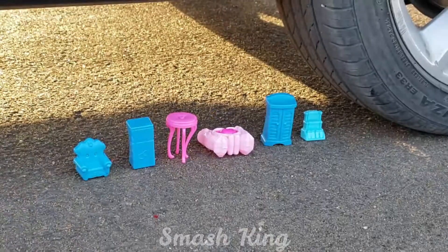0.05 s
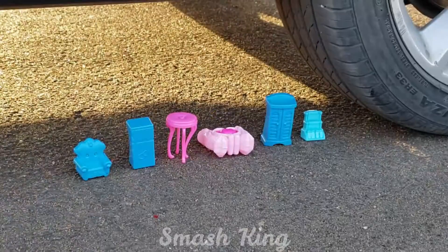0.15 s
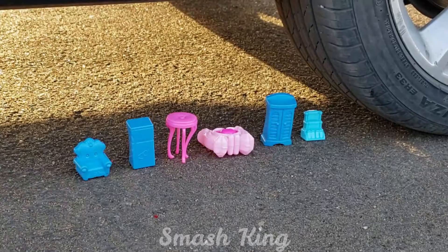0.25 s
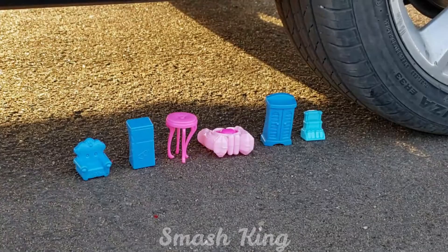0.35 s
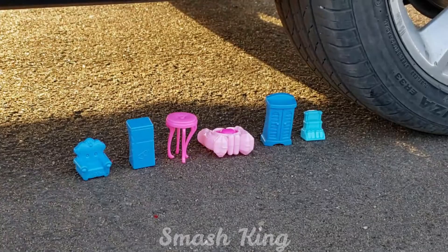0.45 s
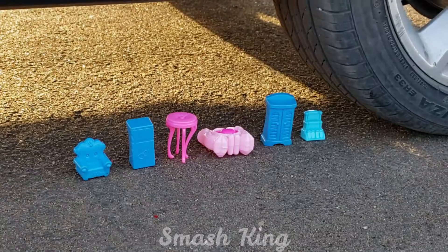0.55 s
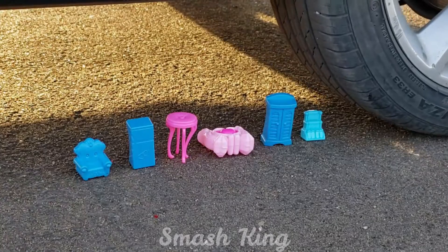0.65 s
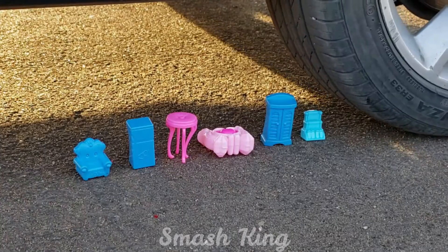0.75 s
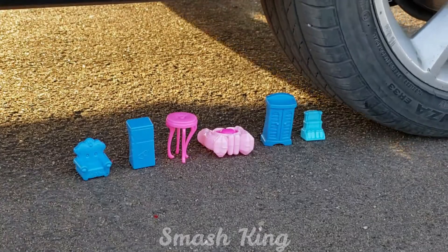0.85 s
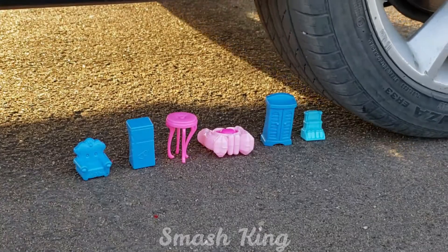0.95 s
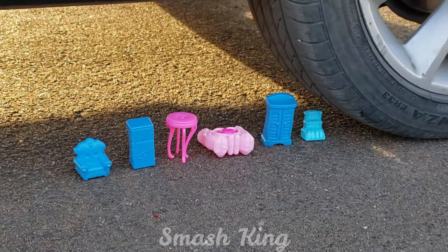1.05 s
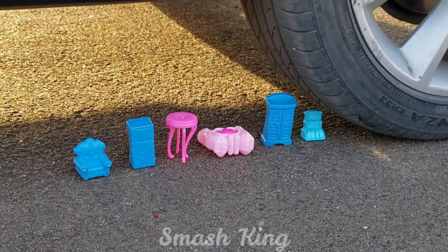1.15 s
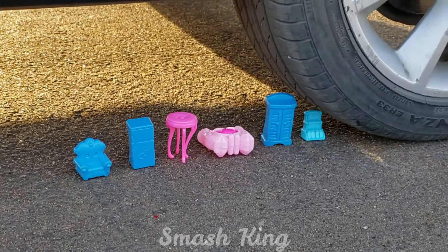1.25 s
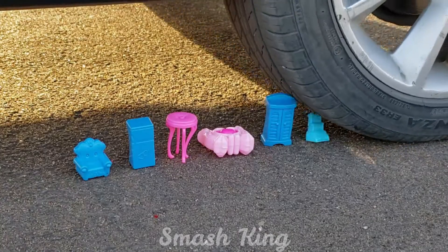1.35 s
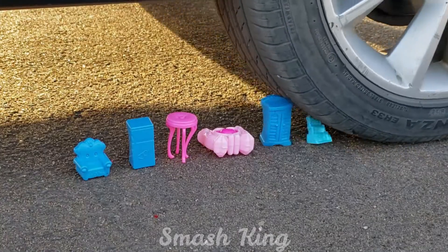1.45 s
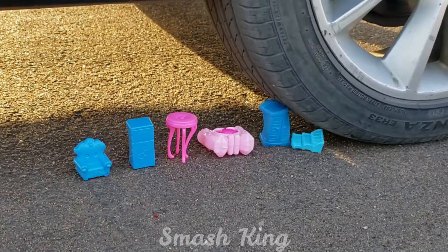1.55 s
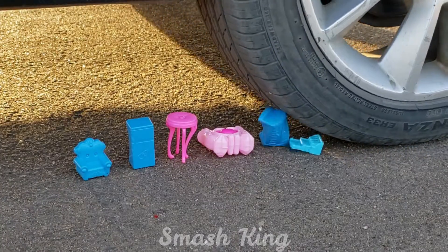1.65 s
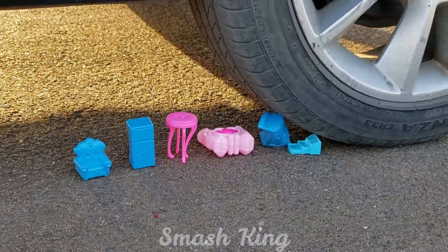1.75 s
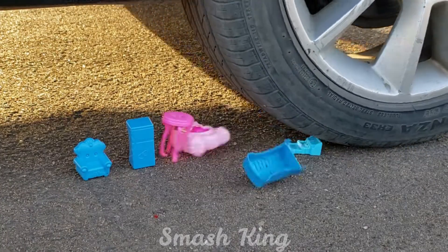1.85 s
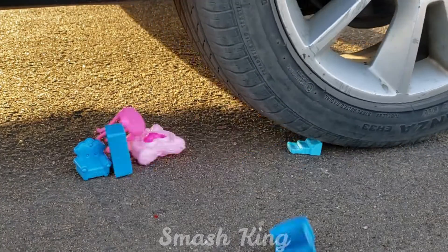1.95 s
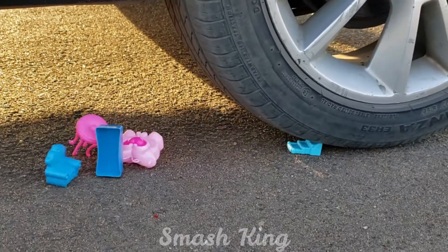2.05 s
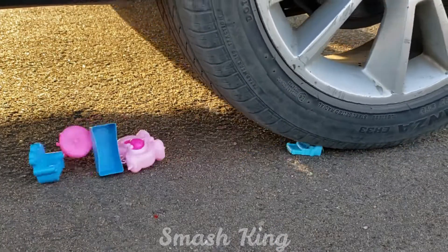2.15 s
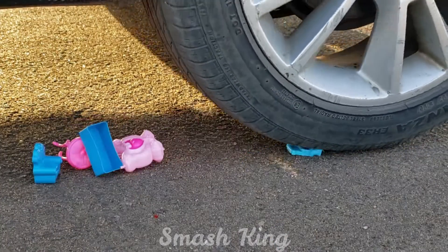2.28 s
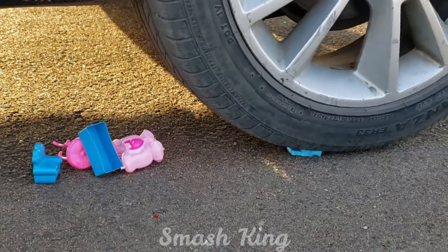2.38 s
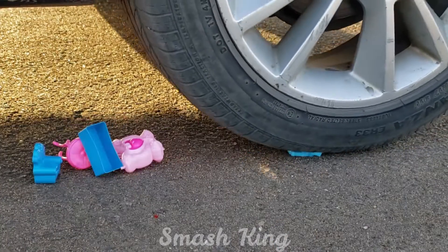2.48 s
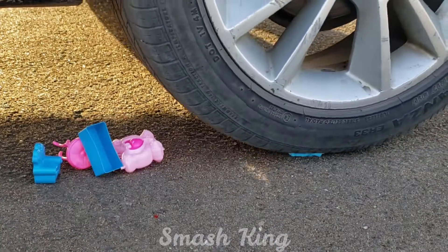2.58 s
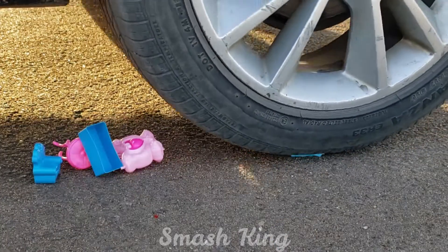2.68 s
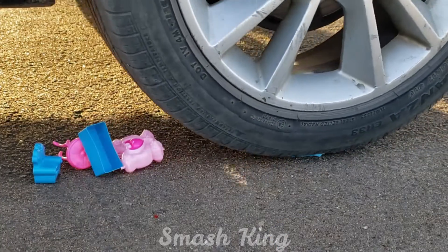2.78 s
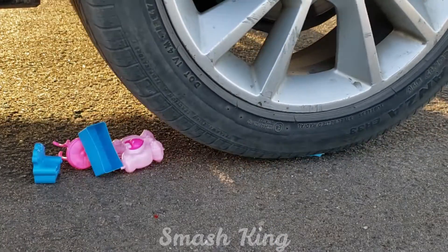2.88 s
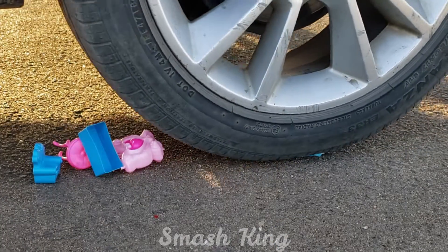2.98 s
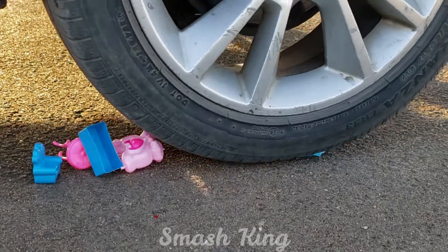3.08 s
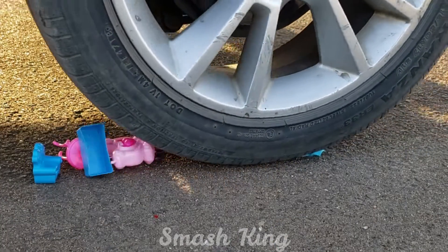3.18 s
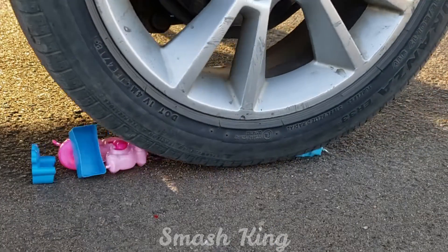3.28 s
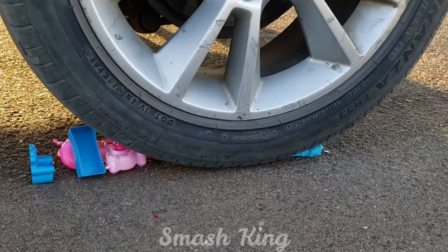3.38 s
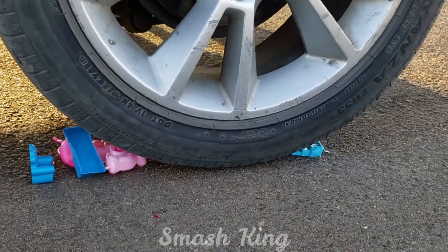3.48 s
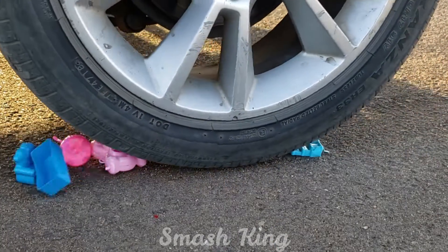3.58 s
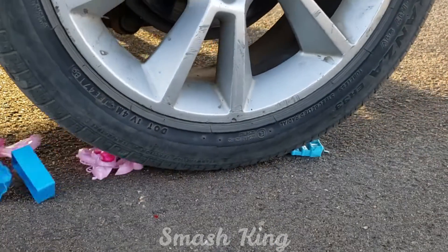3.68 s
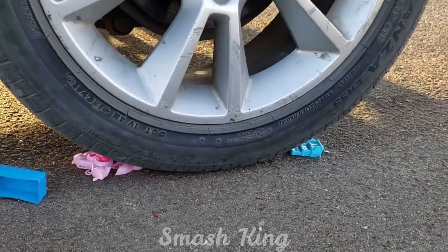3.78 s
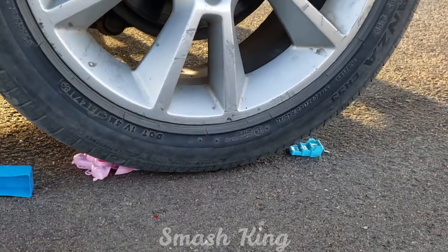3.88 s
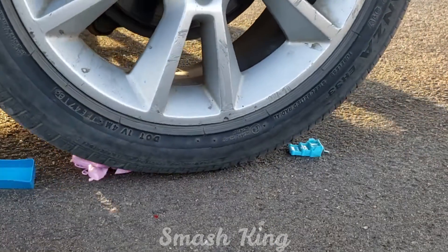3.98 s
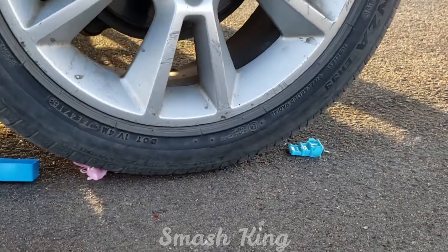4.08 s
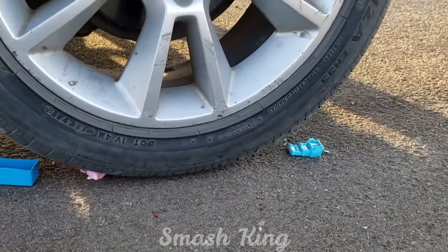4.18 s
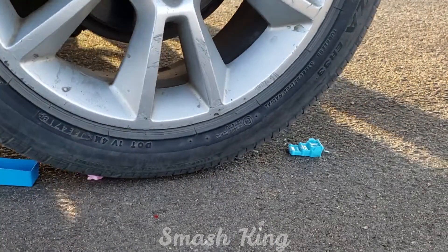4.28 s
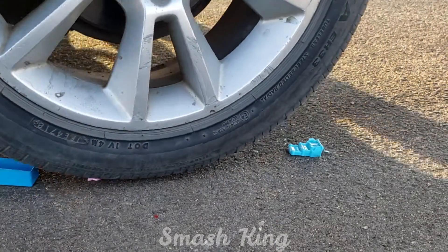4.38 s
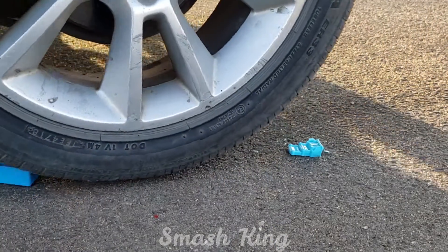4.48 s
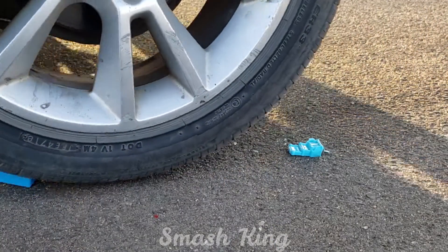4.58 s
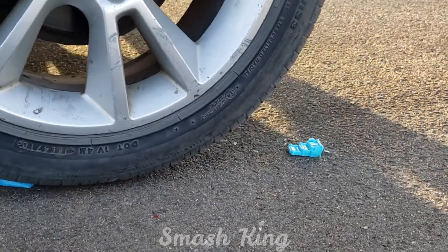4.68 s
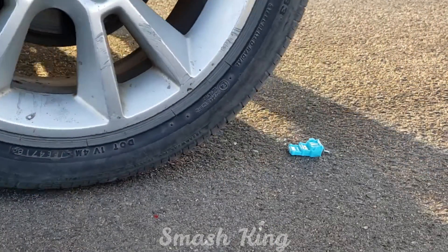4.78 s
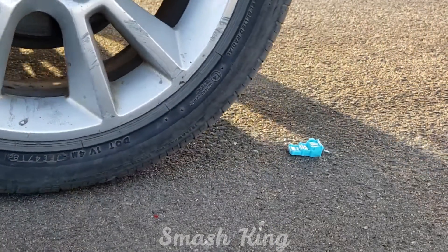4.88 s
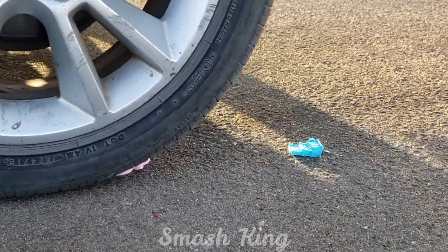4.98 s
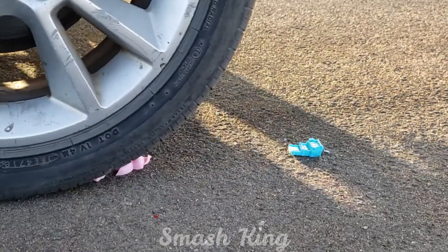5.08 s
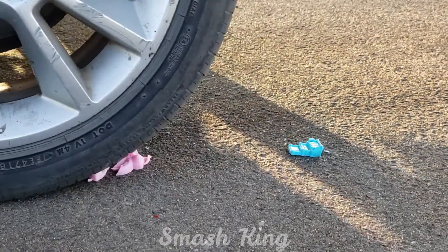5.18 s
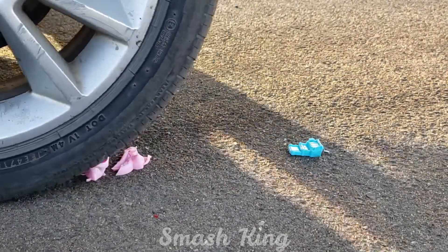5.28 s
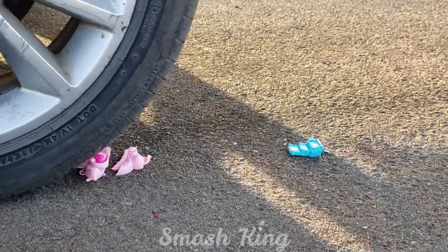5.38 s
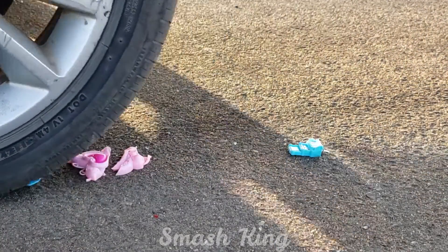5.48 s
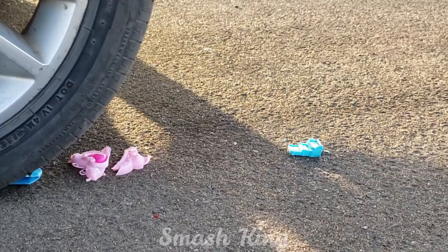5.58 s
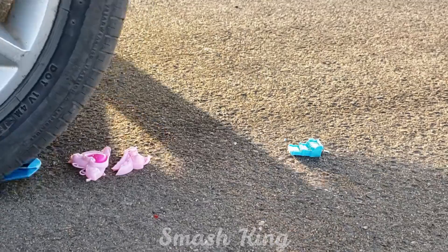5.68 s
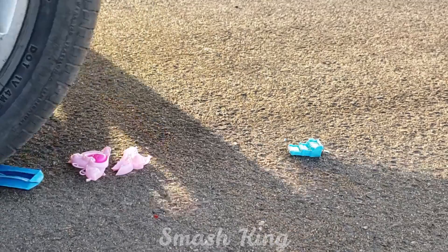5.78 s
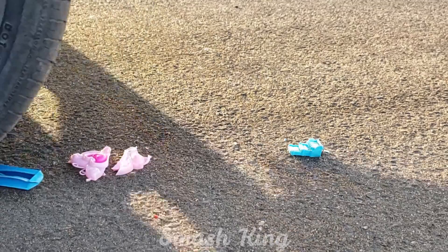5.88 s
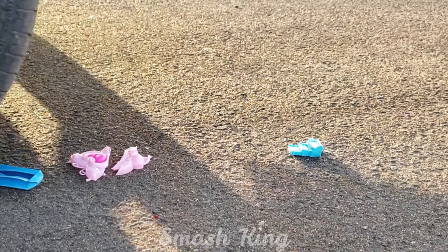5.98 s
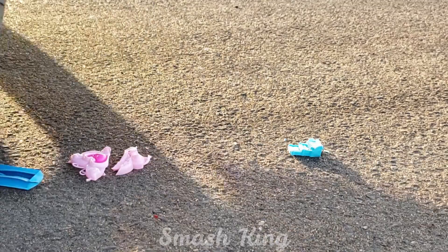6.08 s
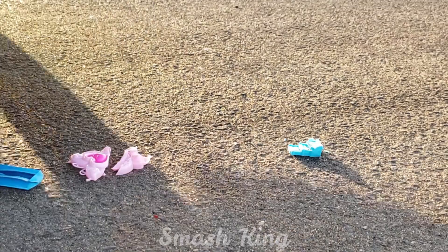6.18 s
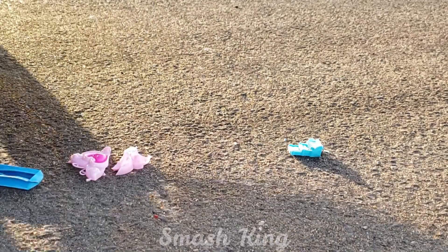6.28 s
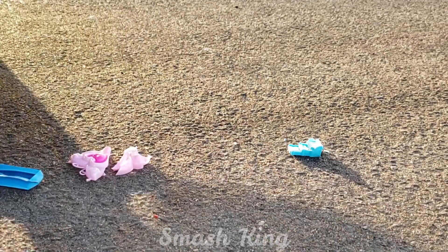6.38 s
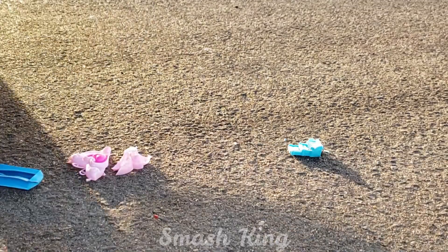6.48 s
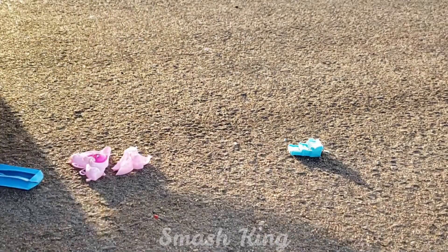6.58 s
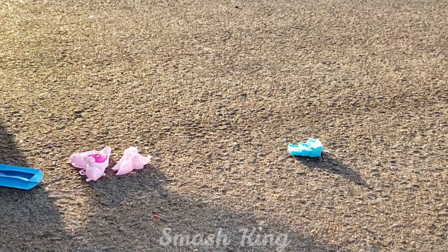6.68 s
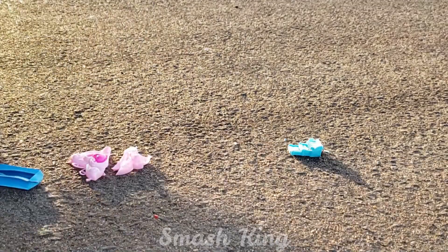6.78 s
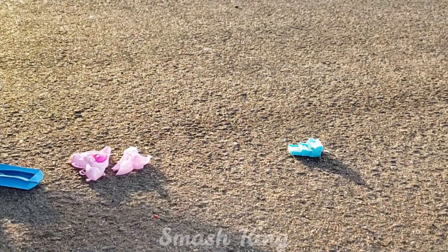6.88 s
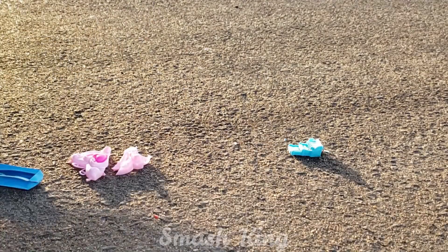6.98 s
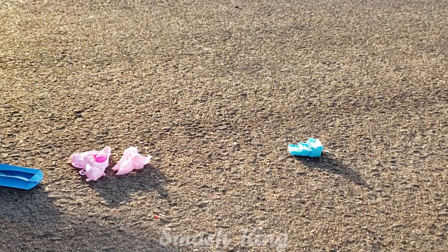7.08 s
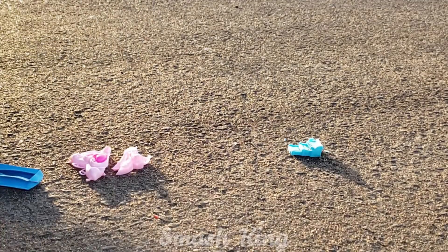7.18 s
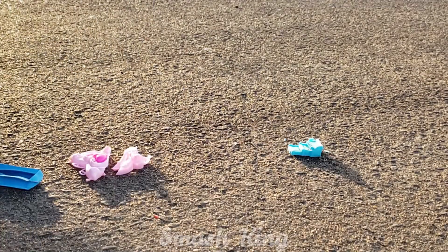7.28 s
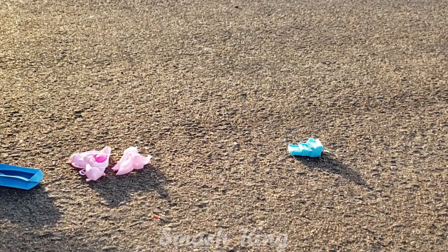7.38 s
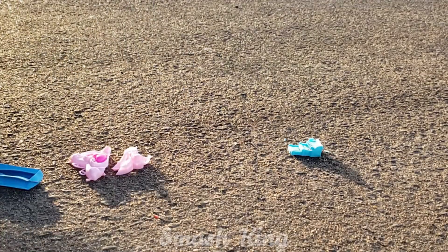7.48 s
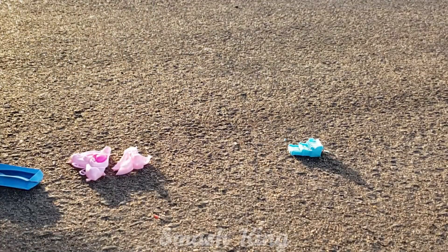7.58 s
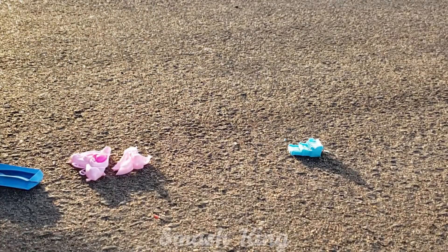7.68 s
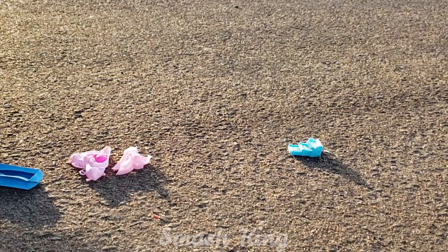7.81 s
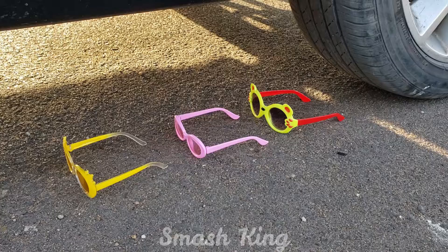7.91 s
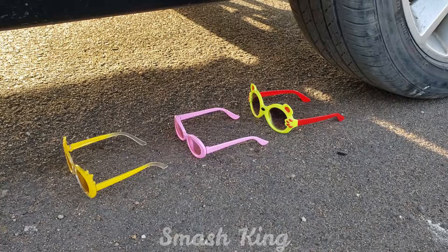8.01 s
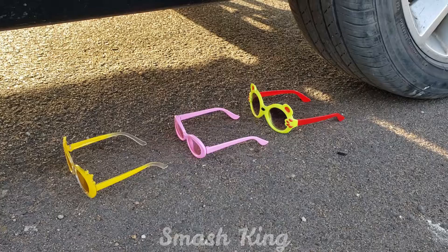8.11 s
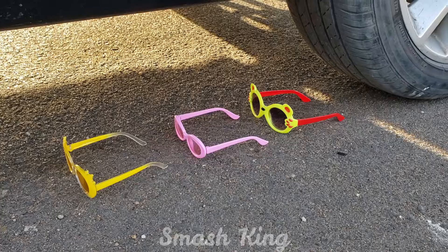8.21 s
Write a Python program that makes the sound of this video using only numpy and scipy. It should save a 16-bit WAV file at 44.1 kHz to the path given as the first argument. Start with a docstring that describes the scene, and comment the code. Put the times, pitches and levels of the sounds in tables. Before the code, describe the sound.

Heard from ground level, a car rolls slowly over plastic toys on asphalt. The engine rumbles alone at first, then settles as sharp, loud cracks and fine crunching begin. The wheel thuds down twice, and a squeezed toy creaks briefly. The snaps thin out as the engine drifts to the left, and in the last moment it abruptly idles closer and a little faster.

```python
"""A car engine idles close by, down at asphalt level, then settles as the car creeps over small plastic toys.
Their hollow shells snap, splinter and creak under the tyre, and twice the wheel drops off one with a ringing
thud. The engine, a pulsing exhaust note with rumble, roar and valve clatter, passes from right to left; at the
very end it abruptly grows louder and idles a little faster. Everything reaches the two ports of a microphone on
the ground with small gaps in time and level."""
import sys
import numpy as np
from scipy import signal
from scipy.fft import rfft, irfft
from scipy.io import wavfile
from scipy.ndimage import uniform_filter1d

SR = 44100
rng = np.random.default_rng(int(sys.argv[2]) if len(sys.argv) > 2 else 0)


def transcribe(u):
    """Save the signal u as a 16-bit wav file named by the first command-line argument.

    u: samples, shape (n,) or (channels, n), limited to [-1, 1]; the rate is SR.
    q: integer samples, one column per channel.
    """
    v = np.clip(np.atleast_2d(u).T, -1, 1)
    q = np.round(v * 32767).astype(np.int16)
    wavfile.write(sys.argv[1], SR, q)


N = 363825
T = np.arange(N) / SR

# Each snap of a toy: start_s, peak_rms_db, ring_hz, low_tilt_db, treble_tilt_db
CRACK_HITS = [(1.395, -31, 1230, 3, -6), (1.425, -14, 1600, -1, 2.5), (1.46, -29.5, 1230, -10, -3),
              (1.502, -25, 1620, 6, 11), (1.506, -20.5, 931, 3, 2), (1.531, -23.5, 1040, 9, 5),
              (1.567, -10.5, 1140, -12, 4.5), (1.572, -19, 3130, -16, 1), (1.579, -18, 1410, -30, 3),
              (1.66, -23.5, 3270, -29, -8), (1.73, -33, 1540, -22, -9), (1.919, -4.5, 2360, 5.5, -9.5),
              (1.934, -9, 2370, 2, -8), (1.945, -22, 2310, 11, 4), (1.957, -18.5, 810, -1, 0),
              (1.97, -19, 2100, 11, 1), (1.999, -24, 1500, 12, -5), (2.031, -24.5, 900, 15, 2),
              (2.047, -23.5, 680, 13, -8), (2.059, -27.5, 5830, 0, 7), (2.077, -17, 878, -7.5, -10.5),
              (2.103, -20, 2170, -20, -10), (2.117, -24.5, 1910, 10, -4), (2.173, -21.5, 2330, -2, -5.5),
              (2.215, -24.5, 2220, 6, -15), (2.225, -19.5, 2000, 6, 9), (2.256, -14, 602, 12.5, 5),
              (2.264, -22, 1400, 12, -11), (2.335, -27.5, 2220, 7, -6), (2.373, -29, 2180, 9, 8),
              (2.383, -20, 1126, 18, 17.5), (2.424, -24.5, 2500, -19, 10.5), (2.491, -34.5, 707, 1, 16),
              (2.557, -18, 1900, 13.5, 4.5), (2.665, -46, 703, -15, 14), (3.263, -31.5, 970, 3, -11),
              (3.355, -36, 980, 8, -6), (3.383, -30.5, 980, 0, -3), (3.41, -21.5, 3000, 2, 9),
              (3.439, -36, 1220, -26, 3), (3.527, -32.5, 730, 7, -42), (3.569, -25.5, 690, 2.5, -30),
              (3.593, -32.5, 1008, 12, -9), (3.626, -33.5, 1230, 18, 0), (3.658, -24.5, 2500, 4, -5),
              (3.677, -28, 1970, -1, -7), (3.706, -25, 1940, 4, -19), (3.716, -10.5, 1490, -2, -15.5),
              (3.732, -16.5, 1710, 3, 2), (3.736, -17, 850, -9, 1), (3.746, -23, 2050, 14, -18),
              (3.801, -28.5, 716, -18, -0.5), (3.829, -37, 4520, -3, -5), (3.849, -33, 2170, -6, -12),
              (3.874, -27, 3730, -16, -3), (3.888, -47, 3503, -12, -15), (3.898, -29.5, 1840, -3, -15),
              (3.908, -37, 3690, -13, -2), (3.92, -38, 1580, -5, -25), (3.927, -29.5, 3930, -13, -1.5),
              (3.954, -36, 2360, -16, -3), (4.039, -24.5, 3760, -20, -6), (4.073, -33, 2094, -9, -10),
              (4.12, -27, 674, -9, -3), (4.164, -33, 4210, -14, -7), (4.184, -34, 2120, -9, -1),
              (4.199, -24, 2120, 11, 5), (4.335, -34.5, 2143, -10, -20), (4.407, -39.5, 1880, -31, -5),
              (4.531, -28.5, 5000, -26, 1.5), (4.608, -13.5, 762, 1, 0.5), (4.679, -30, 840, 13, -11.5),
              (4.83, -38, 1370, 2, 6), (4.875, -14.5, 2680, 0.5, -2), (4.904, -25.5, 2547, 1, -6),
              (4.955, -10, 2330, -1, 1.5), (5.291, -43, 2685, 6, 0), (5.303, -45, 740, 1, 4),
              (5.834, -36.5, 1884, 6, -2), (6.248, -38, 696, -8, -5), (6.284, -27.5, 3390, 21.5, -5),
              (6.315, -24, 5960, -30, -7.5), (6.383, -32.5, 5455, 7, -6), (6.471, -10.5, 867, 8.5, -1.5),
              (6.677, -37, 950, -10, 0), (7.112, -42, 1320, -21, 3), (7.623, -40.5, 685, 13, -20),
              (7.884, -31.5, 677.5, 21.5, -6), (7.933, -37.5, 975, 11, -3), (8.193, -31.5, 648, 24, -9)]
# Tone colour of breaking plastic: freq_hz, gain_db
SHELL_EQ = [(180, -81.5), (300, -9.5), (797, -3), (1280, -2.5), (1540, -2), (1850, -4), (2500, -2),
            (3510, 0), (6650, -2), (9800, -11.5), (12200, -5), (15700, -5.5), (16800, -38)]
# Where the tyre sits in the stereo image: time_s, left_delay_ms, left_over_right_db
TYRE_PAN = [(1.4, 0.073, 0.5), (2.6, 0.08, -1), (3.4, -0.086, 2.5), (4.6, -0.12, 1.5), (5, -0.171, 2.5),
            (6.3, -0.33, 3.5), (8.25, -0.16, 12)]
def crack(start_s, level_db, ring_hz, low_db, treble_db, tear_ms=1.55):
    """A quick run of tiny breaks shakes the shell, which favours its own damped pitch."""
    t, hz = T[:4096], np.fft.rfftfreq(4096, 1 / SR)
    impulses = rng.laplace(size=4096) * (rng.random(4096) < .3)
    age = np.maximum(t - .001, 0) / (tear_ms / 1000)
    breaks = impulses * age ** 0.61 * np.exp(-1.6 * age ** 0.89)
    tilt_db = read([(500, low_db), (1800, 0.0013), (5000, 0.0036), (9000, treble_db)], hz)
    ring_db = np.clip(12.5 - 0.32 * treble_db, 5, 20)  # duller cracks ring more
    resonance_db = ring_db / (1 + (5 * np.log(hz / ring_hz + 1e-9)) ** 2)
    # Flatten the breaks' own colour so they push all pitches alike.
    ripple_db = 10 * np.log10(uniform_filter1d(abs(rfft(breaks)) ** 2, size=30) / np.sum(breaks ** 2))
    snap = coloured(breaks, read(SHELL_EQ, hz) + tilt_db + resonance_db - ripple_db)
    peak_rms = np.sqrt(uniform_filter1d(snap ** 2, size=66).max())
    near = ground_bounce(amp(level_db) * ports(snap / peak_rms, *curves(TYRE_PAN, start_s)))
    heard = underside_echo(near)
    add(heard, 0, near)
    return start_s - .0008, heard


def ground_bounce(x):
    """A few early reflections off asphalt and tyre wall, different at each port."""
    taps = rng.standard_normal((2, 64)) * (rng.random((2, 64)) < .12) * amp(-11.5)
    taps[:, 0] = 1  # the direct sound
    taps /= np.linalg.norm(taps, axis=1, keepdims=True)
    return signal.fftconvolve(x, taps, axes=1)[:, :x.shape[1]]


def underside_echo(x, bright_t60_s=.06, low_t60_s=.085, echo_db=-10):
    """Echoes between asphalt and car floor, different for each port and snap; treble dies first."""
    t = T[:4096]
    bright, low = rng.standard_normal((2, 2, 4096))
    low = signal.lfilter(*signal.butter(2, 1500, fs=SR), low)
    tail = (bright * amp(-60 * t / bright_t60_s) + low * amp(-3 - 60 * t / low_t60_s)) * (t > .0007)
    return signal.fftconvolve(x, amp(echo_db) * tail / np.linalg.norm(tail[0]), axes=1)


# Each thud of the wheel: start_s, gain_db, tyre_air_db, knock_db
WHEEL_DROPS = [(2.256, -23.5, -15.5, -10), (3.738, -24, -6, -2)]
# Ringing modes of rim and tyre: pitch_hz, level_db, t60_s
WHEEL_MODES = [(141.6, -5, 0.19), (208.7, 0, 0.22), (255.8, 4.5, 0.2), (344, -11, 0.12), (424, 0.5, 0.048),
               (610, -11, 0.048), (669, -15, 0.5), (950, -2.5, 0.017)]
def wheel_drop(start_s, gain_db, air_db, knock_db, air_hz=226, air_t60_s=1.47):
    """The wheel falls off a toy: a knock and a shudder ring the rim, tyre and its air; grit sprays."""
    t = T[:SR]
    modes = sum(amp(db - 60 * t / t60) * np.sin(2 * np.pi * hz * t) for hz, db, t60 in WHEEL_MODES)
    air_envelope = amp(air_db - 60 * t / air_t60_s) * (1 - np.exp(-t / 0.014))
    air = air_envelope * np.sin(2 * np.pi * air_hz * t)
    shudder = np.exp(-(t[:4096] / .0276) ** 2) * (1 - np.exp(-t[:4096] / .0045))
    force = 0.073 * rng.standard_normal(4096) * shudder
    force[0] = amp(knock_db)
    thud = ports(signal.fftconvolve(modes, force)[:SR] + air, lag_ms=0, pan_db=0.99)
    grit_eq = read(SHELL_EQ, np.fft.rfftfreq(4096, 1 / SR))
    grit = np.array([coloured(noise, grit_eq) for noise in rng.standard_normal((2, 4096))])
    add(thud, 0, amp(-0.5) * evened(grit) * shudder)
    return start_s, amp(gain_db) * thud


# Stretches of fine splintering: start_s, length_s, level_db, drift_db_per_s
CRUNCH_SPANS = [(1.392, .3, -46, -1), (1.937, 0.62, -36, -22), (3.226, 1.106, -52.5, 1)]
def crunch(splinters_per_s=250, t60_s=0.016):
    """Dense small splinters while plastic is under load, each a dry burst around its own pitch."""
    envelope = sum(amp(db + drift * (T - start)) * held(T, start, length, edge_s=0.085)
                   for start, length, db, drift in CRUNCH_SPANS)
    strength = amp(3.5 * np.minimum(rng.exponential(1, N), 4))
    splinters = strength * (rng.random(N) < splinters_per_s / SR)
    pitch_index = rng.integers(0, 16, N)
    out, t = np.zeros((2, N)), T[:1024]
    for k, hz in enumerate(np.geomspace(1500, 3000, 16)):
        burst = rng.standard_normal(1024) * t * amp(-60 * t / t60_s)
        grain = signal.lfilter(*signal.iirpeak(hz, 7, SR), burst)
        pair = ports(np.roll(evened(grain), 20), lag_ms=0.18 * rng.standard_normal(), pan_db=1.0)
        out += signal.oaconvolve((splinters * (pitch_index == k))[None], pair, axes=1)[:, :N]
    return envelope * evened(out)


# The stutters of one short creak: start_s, length_s, level_db
CREAK_SPANS = [(3.25, 0.0063, -40), (3.265, 0.011, -31.5), (3.281, 0.082, -41.5), (3.369, 0.02, -32)]
def creak(ring_hz=865, width_hz=303, slips_per_s=900):
    """A squeezed toy slips unevenly on the grit, ringing its hollow shell."""
    t = CREAK_SPANS[0][0] - .02 + T[:8192]
    slips = rng.standard_normal(len(t)) * (rng.random(len(t)) < slips_per_s / SR)
    shell = signal.iirpeak(ring_hz, ring_hz / width_hz, SR)
    ring = signal.lfilter(*shell, signal.lfilter(*shell, slips))
    envelope = sum(amp(db) * held(t, start, length, edge_s=0.0032) for start, length, db in CREAK_SPANS)
    return t[0], ports(evened(ring) * envelope, lag_ms=0, pan_db=-1.7)


# Fader moves of the passing engine: time_s, exhaust_db, engine_bay_db
ENGINE_LEVELS = [(0, -33, -43.5), (.6, -33, -45.5), (.9, -39.5, -45.5), (1.4, -29, -47), (1.9, -33, -52),
                 (2.6, -39.5, -57.5), (3.3, -38.5, -57), (3.9, -42, -59.5), (4.4, -46, -62.5),
                 (5.4, -41, -63), (6, -40.5, -62), (6.4, -35, -57.5), (7.1, -35.5, -58), (7.97, -30.5, -54),
                 (7.99, -36, -43), (8.1, -28, -47), (8.25, -35, -47)]
# Tone colours of the low rumble, midrange roar and bright clatter: freq_hz, gain_db
RUMBLE_EQ = [(12, -25), (20, -2), (43, 4.5), (64, 3), (102, -6.5), (160, -2.5), (182, -20.5), (206, -12),
             (400, -16), (520, -19.5), (880, -120)]
ROAR_EQ = [(180, 2), (300, -4.5), (499, -4), (548, -5), (598, 1), (747, -3), (1080, -8.5), (1220, -7),
           (2000, -22.5), (2600, -41), (4400, -120)]
CLATTER_EQ = [(940, -13), (1600, -2.5), (2140, 0.5), (2410, -5), (3110, -9.5), (5110, -11.5), (5530, -12),
              (5800, -13.5), (6220, -8), (8490, -23.5), (10100, -18), (11300, -19), (14500, -16.5),
              (16000, -25), (16500, -51)]
def engine():
    """Exhaust tones, body rumble, roar, and valve clatter that throbs with the firing."""
    exhaust_db, bay_db = curves(ENGINE_LEVELS, T)
    tones, firings = exhaust(exhaust_db, bay_db)
    rumble = engine_noise(RUMBLE_EQ, exhaust_db - 5, flicker_db=1.7, frame=2048)
    roar = engine_noise(ROAR_EQ, bay_db + 8 + 2.5 * fast_idle(), flicker_db=1.73, frame=1024)
    throb = evened(1 + 0.19 * np.exp(-(firings % 1) / 0.39))
    clatter = throb * engine_noise(CLATTER_EQ, bay_db, flicker_db=1.6, frame=512)
    return tones + rumble + roar + clatter + whines(bay_db)


# Idle speed: time_s, firing_hz
FIRING_RATE = [(0, 38.6), (.62, 34.4), (.75, 37.7), (.9, 28.2), (1.39, 31.9), (1.8, 28), (2.3, 26.6),
               (3.8, 27.9), (7.97, 26.65), (7.99, 29.2), (8.17, 31), (8.25, 31)]
# Tone colour of the exhaust pipe: freq_hz, gain_db
PIPE_EQ = [(75, -5.5), (108, -2), (134, -2), (160, 2), (190, -18), (230, -9.5), (300, -30)]
def exhaust(exhaust_db, bay_db):
    """Orders of the firing rate, each wavering; uneven cylinders add weak half orders."""
    firing_hz = curves(FIRING_RATE, T)[0]
    firings = np.cumsum(firing_hz * (1 + 0.0031 * wander(1.5))) / SR
    # The firing tone itself comes through only at fast idle; its octave carries the note.
    main_db = {1: exhaust_db - 36.5 + 34 * fast_idle(), 2: exhaust_db}
    overtone_db = -51 + 0.53 * (bay_db + 62)  # rises about half as much as the engine bay
    out = np.zeros(N)
    for order in np.arange(1, 10.5, .5):
        piped_db = overtone_db + read(PIPE_EQ, order * firing_hz) - 8.7 * (order % 1 > 0)
        gain = amp(main_db.get(order, piped_db) + 2.77 * wander(6.0))
        out += gain * np.sqrt(2) * np.sin(2 * np.pi * (order * firings + rng.random()))
    pair = np.array([out, np.roll(out, 40)]) * amp([[.4], [-.4]])  # the ports hear it a little apart
    return pair, firings


def fast_idle(threshold_hz=31):
    """0 at the settled idle, 1 once the firing rate is 1 Hz over the threshold."""
    return np.clip(curves(FIRING_RATE, T)[0] - threshold_hz, 0, 1)


# The engine's travel from right to left: time_s, left_delay_ms
ENGINE_PAN = [(0, 0.37), (.9, 0.42), (1.5, 0.12), (3, 0.021), (4, -0.29), (5, -0.47), (8.25, -0.46)]
# Stereo width of the engine noise, mono in the bass: freq_hz, left_right_correlation
ENGINE_COHERENCE = [(60, 1), (130, 1), (250, 1), (500, 0.46), (2000, 0.078), (6000, 0.23), (15000, 0.17)]
def engine_noise(eq, level_db, flicker_db, frame):
    """Shaped noise that flickers in patches, partly shared by the ports and lagged as the car passes."""
    hop = frame // 4
    hz, t = np.fft.rfftfreq(frame, 1 / SR)[:, None], np.arange(N // hop + 5) * hop / SR
    right_re, right_im, own_re, own_im, patches = rng.standard_normal((len(t), len(hz), 5)).T
    patches = evened(uniform_filter1d(uniform_filter1d(patches, size=9, axis=0), size=9, axis=1))
    shared = np.clip(read(ENGINE_COHERENCE, hz), 0, 1)
    delay = np.exp(-2j * np.pi * hz * curves(ENGINE_PAN, t)[0] / 1000)
    right = right_re + 1j * right_im
    left = amp(1.8) * delay * (shared * right + np.sqrt(1 - shared ** 2) * (own_re + 1j * own_im))
    spectra = np.array([left, right]) * amp(read(eq, hz) + flicker_db * patches)
    noise = signal.istft(spectra, nperseg=frame, noverlap=frame - hop)[1][:, :N]
    return amp(level_db) * noise / np.sqrt(np.mean(noise.mean(0) ** 2))


# A body drone and thin engine whines: pitch_hz, width_hz, over_bay_db, change_from_behind_db
WHINE_BANDS = [(244.7, 41.6, -1.5, 0), (5200, 8, -17, -4), (5852, 10, -22, 6), (5986, 10, -22, 7),
               (6290, 60, -21, 8), (11978, 10, -22, 0), (14070, 10, -24, 1)]
def whines(bay_db):
    """Narrow bands of noise: fuzzy tones that swell and shift in balance once the car has passed."""
    behind = held(T, start_s=6.5, length_s=1.4, edge_s=.3)
    lag_s = np.outer([1, 0], curves(ENGINE_PAN, T)[0]) / 1000
    out = np.zeros((2, N))
    for hz, width_hz, db, behind_db in WHINE_BANDS:
        pole = np.exp(-np.pi * width_hz / SR)
        fuzz = signal.lfilter([1], [1, -pole], rng.standard_normal(N) + 1j * rng.standard_normal(N))
        band = evened((fuzz * np.exp(2j * np.pi * hz * (T - lag_s))).real)
        out += amp(db + behind_db * behind + 2 * wander(.5)) * band
    return amp(bay_db) * out


def whistle(top_hz=6045, sag_hz=225, level_db=-63.5):
    """A faint whistle near the engine bay; its pitch sags briefly as the load comes on."""
    hz = top_hz - sag_hz * np.exp(-((T - 1.07) / .2) ** 2)
    envelope = amp(level_db + 2 * wander(6.9)) * held(T, start_s=0, length_s=1.5, edge_s=.1)
    return envelope * np.sqrt(2) * np.sin(2 * np.pi * np.cumsum(hz) / SR)


def hum(pitch_hz=134.5, level_db=-41, gone_s=2.2):
    """A low hum of steady pitch that fades as the engine bay moves off."""
    envelope = amp(level_db + 2 * wander(9)) * np.clip(2 - 2 * T / gone_s, 0, 1)
    return envelope * np.sqrt(2) * np.sin(2 * np.pi * pitch_hz * T)


# Fader moves of the thin tone: time_s, level_db
THIN_TONE_LEVELS = [(0, -49.5), (.5, -68), (1.4, -51), (3.2, -70), (5.5, -82), (6.7, -63.5), (7.97, -82),
                    (7.99, -52.5), (8.25, -52)]
def thin_tone(pitch_hz=1241):
    """A faint sine of steady pitch that comes and goes."""
    envelope = amp(curves(THIN_TONE_LEVELS, T)[0] + 1.88 * wander(2))
    return envelope * np.sqrt(2) * np.sin(2 * np.pi * pitch_hz * T)


def amp(db):
    """Decibels to gain."""
    return 10 ** (np.asarray(db) / 20)


def evened(x):
    """Scales to rms 1."""
    return x / np.sqrt(np.mean(x ** 2) + 1e-20)


def read(points, hz):
    """Reads a spectrum table on a log-frequency axis."""
    table_hz, values = np.transpose(points)
    return np.interp(np.log(hz + 1), np.log(table_hz + 1), values)


def curves(table, t):
    """Each value column of an automation table at the times t."""
    times, *columns = np.transpose(table)
    return [np.interp(t, times, column) for column in columns]


def held(t, start_s, length_s, edge_s):
    """Gain that holds at 1 for a length, with a soft edge before and after."""
    return np.clip(np.minimum(t - start_s, start_s + length_s - t) / edge_s + 1, 0, 1) ** 2


def wander(cutoff_hz, steps_per_s=40):
    """Slow random drift of rms 1."""
    steps = rng.standard_normal(int(N / SR * steps_per_s) + 2)
    smooth = signal.lfilter([1], [1, -np.exp(-2 * np.pi * cutoff_hz / steps_per_s)], steps)
    return evened(np.interp(T, np.arange(len(steps)) / steps_per_s, smooth))


def coloured(x, db):
    """Minimum-phase EQ with the gain db on the rfft grid of x."""
    log_gain = np.log(amp(np.maximum(db, -100)))
    phase = -signal.hilbert(np.r_[log_gain, log_gain[-2:0:-1]]).imag[:len(db)]
    return irfft(rfft(x) * np.exp(log_gain + 1j * phase))


def ports(x, lag_ms, pan_db):
    """One source at two ports: the left is later by lag_ms and louder by pan_db."""
    half_delay = np.exp(-1j * np.pi * np.fft.rfftfreq(len(x), 1 / SR) * lag_ms / 1000)
    pair = irfft(rfft(x) * np.array([half_delay, 1 / half_delay]), len(x))
    return amp([[pan_db / 2], [-pan_db / 2]]) * pair


def add(mix, start_s, sound):
    """Mixes in a two-channel sound."""
    part = mix[:, round(start_s * SR):][:, :sound.shape[1]]
    part += sound[:, :part.shape[1]]


def scene():
    """Breaking toys and wheel thuds over the bed of the engine."""
    mix = engine() + whistle() + thin_tone() + hum() + crunch()
    for hit in CRACK_HITS:
        add(mix, *crack(*hit))
    for drop in WHEEL_DROPS:
        add(mix, *wheel_drop(*drop))
    add(mix, *creak())
    return mix


def record(dry, ceiling=.93, cutoff_hz=16900):
    """The input stage rounds off the highest peaks, then a low-pass trims the top."""
    rounded = dry / (1 + (dry / ceiling) ** 4) ** .25
    lowpass = signal.firwin(511, cutoff_hz, window=("kaiser", 9), fs=SR)
    return signal.oaconvolve(rounded, lowpass[None], "same")


dry = scene()
out = record(dry)
transcribe(out)
```